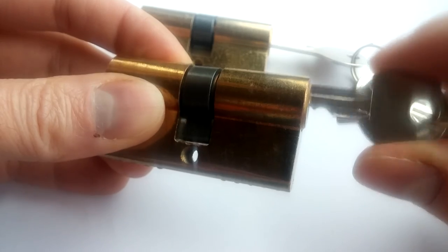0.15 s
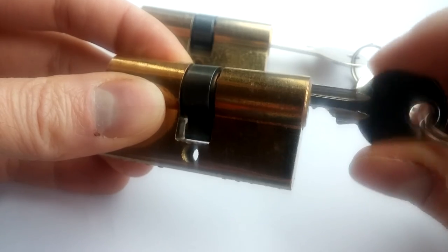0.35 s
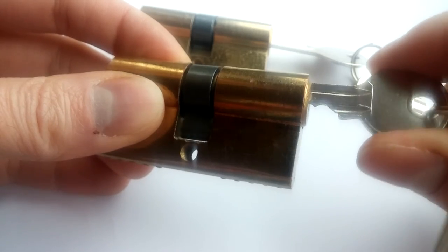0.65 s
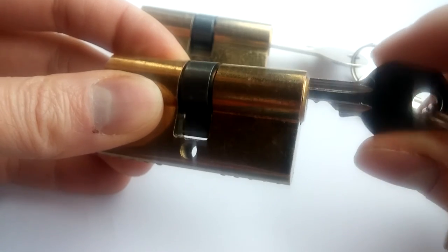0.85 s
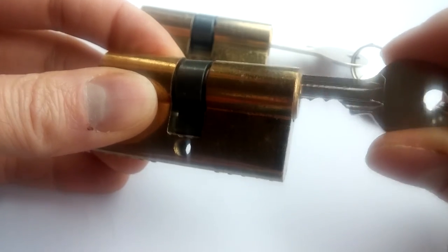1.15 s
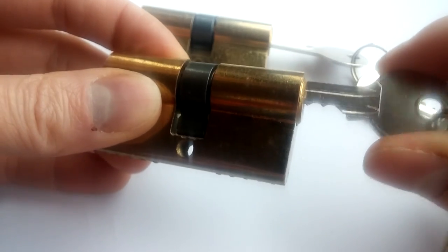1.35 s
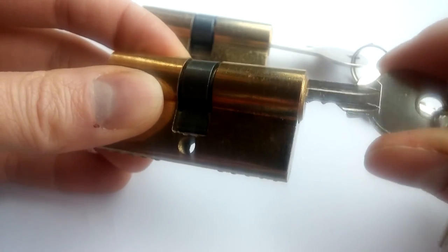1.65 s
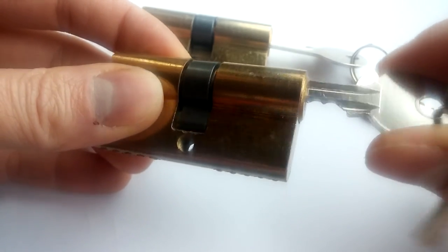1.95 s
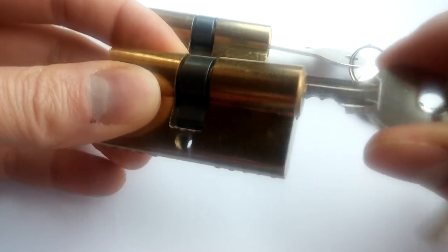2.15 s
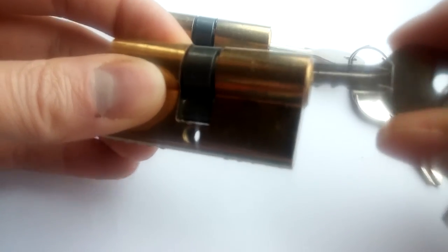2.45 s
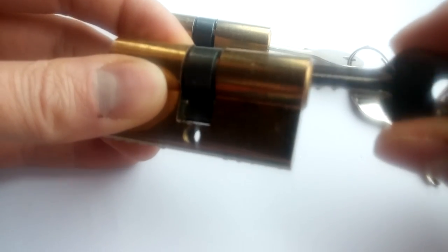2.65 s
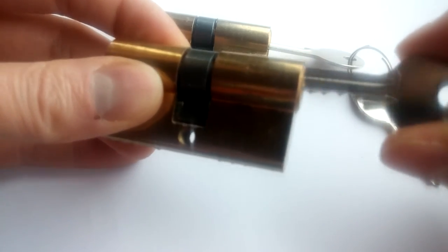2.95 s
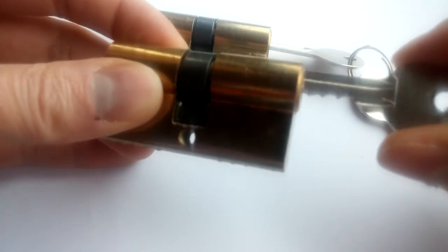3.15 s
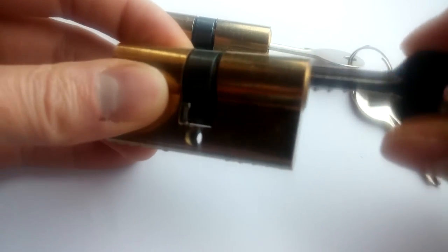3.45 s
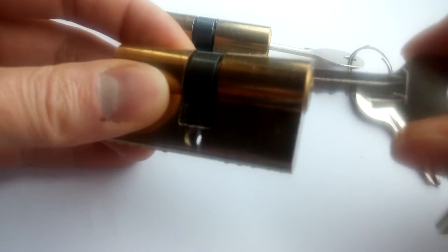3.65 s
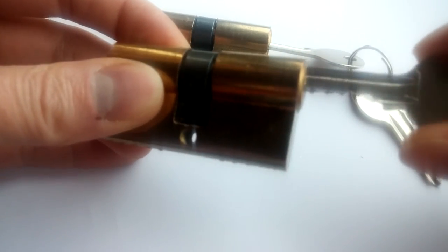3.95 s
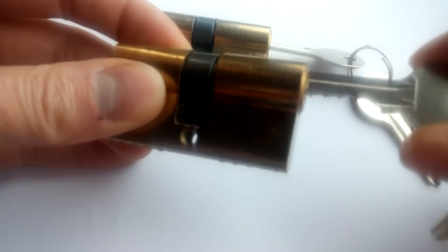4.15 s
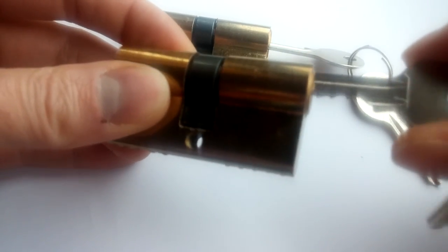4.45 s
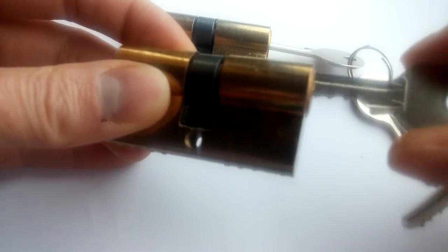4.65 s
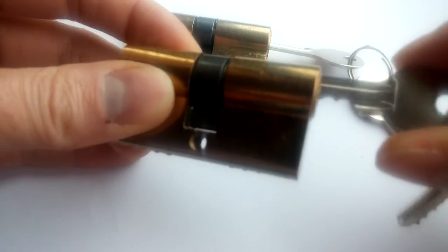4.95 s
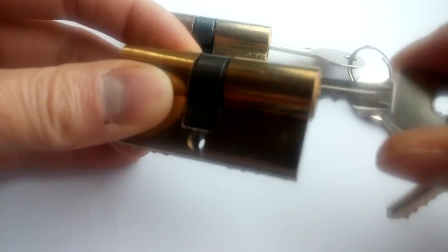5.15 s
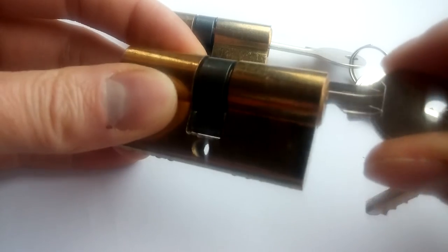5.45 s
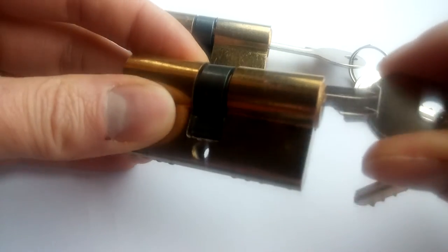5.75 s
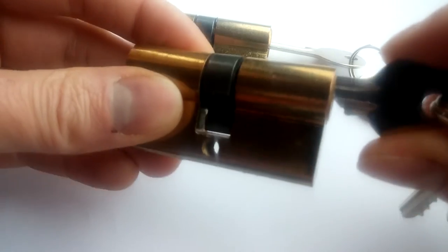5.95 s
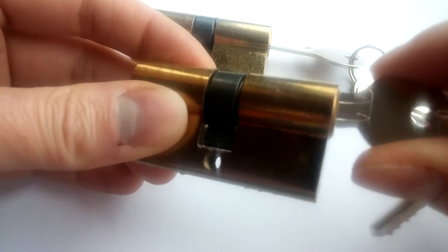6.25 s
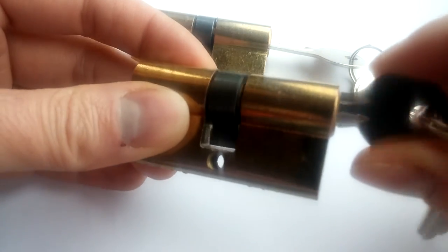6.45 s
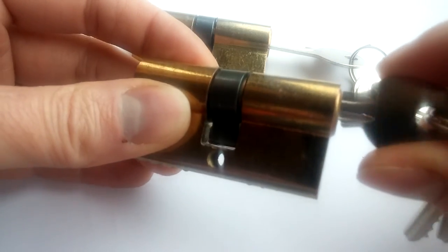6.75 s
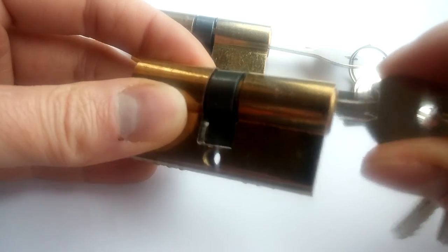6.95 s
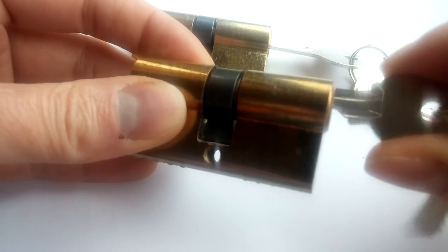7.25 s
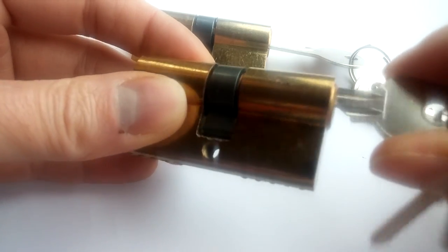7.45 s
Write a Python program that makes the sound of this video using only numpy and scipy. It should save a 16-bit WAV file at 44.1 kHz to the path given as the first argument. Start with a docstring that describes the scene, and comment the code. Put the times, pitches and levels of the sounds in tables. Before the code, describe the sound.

Close up in a small quiet room, a key is worked in a hand-held brass lock cylinder. Its teeth scrape under sprung pins in quick, crisp ratchety clusters, with sharp snaps, thin ringing springs and a few faint clinks of spare keys. Bursts alternate with near-quiet pauses. Soft low bumps and rubbing of hands on a desk come midway and late, ending on a hard click. Stereo microphones hear the metal towards the right.

```python
"""A key works in and out of a hand-held brass lock cylinder, close to the microphones and to their right.
Its teeth rasp under sprung pins that snap into notches: bursts of tiny impacts ring the lock's resonances.
Springs, knocks and spare keys on the ring add decaying tones; idle pins tick faintly.
Hands bump and rub the desk, heard as filtered blows and noise, over a low rumble, a soft hiss and a faint hum.
The small room answers the metal and the bumps with short noise echoes."""
import sys
import numpy as np
from scipy import signal
from scipy.fft import rfft, irfft, next_fast_len
from scipy.io import wavfile
from scipy.ndimage import uniform_filter1d, map_coordinates

SR = 44100
rng = np.random.default_rng(int(sys.argv[2]) if len(sys.argv) > 2 else 0)


def wav_out(sig):
    """Save sig, one row per channel (or a flat mono array), as 16-bit PCM at SR to the path in sys.argv[1]."""
    wavfile.write(sys.argv[1], SR, np.round(np.clip(np.atleast_2d(sig).T, -1, 1) * 32767).astype(np.int16))


N = 334719

# Levels in the tables are relative: gains, scatter and the room come after them.
# Room rumble and hiss: (time [s], rumble level [dB], hiss level [dB])
BACKGROUND_LEVELS = [(0.0, -68, -79), (0.21, -63.5, -75.5), (0.67, -51.5, -64.5), (0.95, -66, -75),
                     (1.92, -51, -66.5), (2.16, -52, -63), (2.49, -54, -61.5), (2.79, -59, -72.5),
                     (3.38, -53, -70), (3.51, -50, -68), (4.06, -58.5, -70.5), (5.24, -54.5, -66),
                     (5.56, -62, -71.5), (5.87, -59.5, -71), (6.24, -43.5, -60.5), (6.51, -58, -69.5),
                     (7.25, -54, -68.5), (7.59, -48.5, -57.5)]
# Colour of the rumble: (frequency [Hz], level [dB])
RUMBLE_COLOUR = [(22, -34.5), (32, -23), (42, 1), (60, 1.5), (96, -7.5), (135, -1), (175, -15),
                 (200, -20.5), (232, -5.5), (275, -23.5), (320, -29), (420, -35), (700, -61.5)]
# Colour of the hiss, also of skin rustle: (frequency [Hz], level [dB])
HISS_COLOUR = [(200, -5), (400, -1), (900, -6), (1400, -13.5), (2500, -14.5), (5000, -19), (10000, -23),
               (16000, -24)]
# Key held lightly, pins ticking at random; none if the end precedes the start: (start [s], end [s])
IDLE_SPANS = [(0.128, .27), (4.3, 5.4), (6.5, 6)]
# Key's teeth passing under the pins: (time of crest [s], level [dB], half length [s], treble [dB])
TOOTH_PASSES = [(0.171, -60, 0.013, -11), (0.289, -40.5, 0.015, -4), (0.369, -48, 0.0085, 5),
                (0.409, -41.5, .009, -0.5), (0.519, -31.5, .012, 2.5), (0.602, -41, 0.0051, 7),
                (0.641, -35, 0.011, 4.5), (.74, -27.5, 0.013, 6), (0.82, -38, .004, 2),
                (0.847, -50, .012, 15), (1.572, -56, 0.013, 0), (1.6, -39, 0.0059, -2),
                (1.671, -35.5, 0.014, 7), (1.861, -35, 0.0092, -1), (2.009, -27.5, 0.0088, 2),
                (2.086, -52, 0.026, 2), (2.139, -27.5, 0.0096, 3.5), (2.245, -27.5, .013, 3),
                (2.328, -47, 0.016, 5), (2.368, -32, .013, 2.5), (2.456, -27.5, 0.014, 4.5),
                (3.307, -50.5, .013, 0), (3.417, -35.5, 0.014, 4.5), (3.464, -35, 0.0046, 13),
                (3.536, -28.5, 0.013, 7.5), (3.623, -31.5, .012, 4), (3.658, -39, 0.013, 15),
                (3.746, -48.5, 0.0066, 5), (3.87, -61.5, .013, 2), (4.38, -48.5, 0.014, -7.5),
                (4.469, -32, 0.012, 0.5), (4.762, -52, 0.0074, -8), (4.898, -52, .012, -10),
                (4.979, -32, 0.01, -7.5), (5.136, -50, .009, -12), (5.22, -29.5, .01, 7),
                (5.33, -52.5, 0.0085, 5), (5.374, -48.5, 0.0091, -1), (5.416, -37, 0.0098, 4.5),
                (5.998, -56, 0.019, -2), (6.148, -54.5, 0.018, 1), (6.178, -47, 0.0045, 3),
                (6.271, -36.5, 0.0077, 3), (6.346, -44.5, 0.0094, -5.5), (6.575, -49.5, 0.0073, -14),
                (6.644, -55, 0.0075, -17), (6.692, -60, 0.013, 11), (7.092, -58, 0.007, -7),
                (7.228, -54.5, 0.011, -1), (7.395, -35.5, 0.017, 1.5), (7.502, -25, 0.0082, 0),
                (7.535, -33.5, 0.0057, 14)]
# Pins snapping home: (time [s], level [dB], treble [dB])
PIN_SNAPS = [(0.19, -44.5, -17), (0.2717, -48, -12), (0.284, -31.5, -2), (0.305, -29.5, 7),
             (0.4176, -30.5, -16), (.505, -32, 6), (0.5266, -26.5, -8), (0.5674, -34.5, 8), (.601, -29, 15),
             (0.6346, -33, 9), (0.6443, -31, 14), (0.6513, -26, -4), (0.732, -29, -2), (0.8203, -36, -3),
             (0.8649, -39.5, 8.5), (1.2141, -25, 13.5), (1.3065, -38.5, 8), (1.5983, -20, 23.5),
             (1.6771, -22.5, 4.5), (1.6966, -29, 11), (1.702, -30, 14), (1.8662, -23, 1.5),
             (2.0513, -34.5, 8), (2.1012, -30.5, 19), (2.132, -16, 15), (2.144, -15.5, 10.5),
             (2.162, -32, 3), (2.2125, -34, 14), (2.235, -22, 10), (2.2415, -18.5, -1.5), (2.262, -27, 15),
             (2.3524, -31, 16), (2.3727, -28.5, -7), (2.4471, -23.5, 12), (2.477, -31, 4),
             (2.4884, -25.5, 9.5), (2.9682, -29.5, 11.5), (3.2918, -41.5, 10.5), (3.3203, -36.5, -5),
             (3.4025, -34, -11), (3.4108, -22, -1), (3.4318, -29, 16), (3.464, -39, 13), (3.531, -41, 14),
             (3.5444, -31.5, 7), (3.647, -26.5, 14), (3.673, -28, 15), (3.8356, -51, 0), (4.461, -29.5, 4),
             (4.5187, -36, 7.5), (4.763, -41.5, -14), (4.9, -40, 7), (4.9768, -38, -15), (4.995, -50, 3),
             (5.199, -30, 18), (5.2116, -25.5, 11), (5.2261, -23.5, -9), (5.308, -38, 9),
             (5.4149, -29.5, 6), (5.745, -56, -24), (6.0353, -32, 4.5), (6.1812, -32.5, 9),
             (6.2656, -28.5, 17), (6.2726, -27, -1), (6.323, -39.5, 1), (6.5354, -51.5, -2),
             (6.682, -49, -0.5), (7.031, -56, 2), (7.093, -42.5, -7), (7.2161, -45.5, -4), (7.371, -31, 9),
             (7.475, -39, 1), (7.493, -27.5, -14), (7.5029, -14.5, -3), (7.5308, -27, 17)]
# Broad colour of the brass lock: (frequency [Hz], level [dB])
BRASS_COLOUR = [(100, -32), (400, -27), (800, -15), (1200, -17), (2000, -9), (2500, 2), (3000, -3),
                (3600, -3.5), (5500, 6), (7200, -4.5), (9000, -4.5), (11000, -9.5), (13300, -14.5),
                (15200, -9)]
# Resonances of springs, pins and key blade: (frequency [Hz], width [Hz], level against the broad colour [dB])
LOCK_RESONANCES = [(1610, 91, -2), (2634, 120, 8.5), (3760, 300, 2.5), (5730, 530, -8), (8490, 110, 2.5),
                   (12300, 130, -4.5), (14700, 140, -8.5), (15350, 350, -2.5)]
# Strength of the springs' ring in a contact: (time [s], level [dB])
SPRING_RING_LEVELS = [(0, -3), (2.0, -2.5), (2.4, -3.5), (3.0, -1.5), (3.5, -1.5), (4.5, 1.5), (7.2, -3.5),
                      (7.35, -6.5)]
# A pin's spring set singing: (time [s], level [dB], frequency [Hz])
SPRING_TONES = [(0.294, -32, 2640), (0.511, -26, 8490), (0.750, -36, 2646), (1.306, -47, 4050),
                (1.425, -52.5, 2560), (1.820, -44, 2660), (2.240, -35, 2634), (2.969, -45, 2700),
                (3.461, -40, 2540), (3.499, -41.5, 2670), (3.746, -47.5, 8500), (4.358, -51.5, 2640),
                (4.465, -24.5, 8490), (4.971, -28.5, 8490), (5.205, -36, 8490), (6.176, -27.5, 8490),
                (6.180, -37.5, 2670), (6.266, -44, 8490), (7.091, -62, 2590)]
# Fingers shifting their grip: (start [s], length [s], level [dB], hardness [Hz])
GRIP_SHIFTS = [(0.502, 0.1, -49, 250), (1.22, .05, -54.5, 350), (2.0, 0.39, -47.5, 151),
               (2.629, 0.11, -40, 150), (3.391, 0.33, -46, 143.6), (4.449, 0.093, -46.5, 258),
               (5.218, 0.1, -44.5, 280), (6.079, .18, -42, 216), (6.33, .13, -37.5, 260)]
# Key's shoulder knocking on the cylinder: (time [s], level [dB], frequency [Hz])
SHOULDER_KNOCKS = [(0.740, -33.5, 800), (2.144, -26, 1730), (2.240, -38.5, 790), (2.457, -39.5, 920),
                   (5.225, -32.5, 1600), (7.501, -28.5, 1565)]
# Spare key struck: (time [s], level [dB])
KEY_CLINKS = [(2.246, -41.5), (2.26, -43), (3.424, -43), (3.653, -49), (7.501, -36), (7.531, -45)]
# Modes of a spare key: (frequency [Hz], level [dB], t60 [s])
SPARE_KEY_MODES = [(3946, -2, .1), (5184, -6, .1), (6013, -4, .1), (7400, -9, .14), (8450, -5, .11),
                   (9076, -11, .09), (11360, -2, .13), (14670, -4, .1)]
# Hands bumping the desk: (time [s], level [dB], hardness [Hz])
DESK_BUMPS = [(2.63, -28.5, 168), (2.646, -24.5, 232), (5.962, -25.5, 684), (5.971, -24.5, 750),
              (5.98, -27.5, 400), (6.079, -18.5, 174), (6.347, -31, 400)]
# Resonances of the desk: (frequency [Hz], width [Hz], level [dB])
DESK_RESONANCES = [(71.3, 39, 6), (145, 52, 0.5), (238, 37, -7.5), (400, 660, -13.5), (800, 45, -6)]
# Left channel's gain on the metal, as the lock sits to the right: (frequency [Hz], gain [dB])
LEFT_GAIN = [(300, 5.5), (800, 0.5), (1300, 1), (2400, -10), (4400, -14), (8100, -10.5), (12500, -7),
             (15000, -3.5)]
# Decay of the small room: (frequency [Hz], t60 [s])
ROOM_DECAY = [(200, 0.55), (2600, .3), (8000, 0.22), (16000, 0.025)]

TOP_HZ = 16000  # the microphones' band limit
SIZE = 8192  # samples in one short sound
AGE = np.arange(SIZE) / SR
HZ = np.fft.rfftfreq(SIZE, 1 / SR)
DRAG_DB, DRAG_T60 = -16.5, 0.14  # past the tooth, the blade drags on in the keyway (t60 in s)
CATCH, RELEASE = 1, 1.18  # a tooth's rise and fall, in half lengths
# loose pins tick around each tooth: rate, level against the rasp, spread in half lengths
TICKS_PER_S, TICKS_DB, TICKS_SPREAD = 390, -14, 2.7


def amp(db):
    """Decibels to gain."""
    return 10 ** (np.asarray(db) / 20)


def unit(x):
    """Scale to rms 1."""
    return x / np.sqrt(np.mean(x ** 2) + 1e-20)


def along(points, hz):
    """Read (frequency [Hz], value) points on a log axis."""
    f, v = np.transpose(points)
    return np.interp(np.log(hz + 1), np.log(f), v)


def filtered(x, response):
    """Multiply the spectrum of x by a response of frequency."""
    m = next_fast_len(N + SR // 2)
    return irfft(rfft(x, m) * response(np.fft.rfftfreq(m, 1 / SR)), m)[..., :N]


def causal(gain):
    """The minimum-phase response that has this gain."""
    cepstrum = irfft(np.log(np.maximum(gain, 1e-6)))
    cepstrum[1:SIZE // 2] *= 2
    cepstrum[SIZE // 2 + 1:] = 0
    return np.exp(rfft(cepstrum))


def resonances(modes):
    """Summed response of (frequency [Hz], width [Hz], level [dB]) resonances."""
    return sum(amp(db) * 1j * HZ * w / (f * f - HZ * HZ + 1j * HZ * w) for f, w, db in modes)


def add(track, s, sound):
    """Mix a sound into the track from time s."""
    start = max(round(s * SR), 0)
    part = track[..., start:start + sound.shape[-1]]
    part += sound[..., :part.shape[-1]]


def wobble(per_s):
    """A smooth random curve with this many knots a second."""
    return map_coordinates(rng.standard_normal(256), [np.arange(N) * per_s / SR], mode="wrap")


def impacts(per_s, scatter_db):
    """Tiny blows at random moments, of unequal size and either direction."""
    size = amp(scatter_db * np.clip(rng.standard_normal(SIZE), -2, 2))
    struck = rng.random(SIZE) < per_s / SR
    return struck * size * rng.choice([-1, 1], SIZE)


def spring_ring(s):
    """Base strength of the springs' ring at time s, in dB."""
    return np.interp(s, *np.transpose(SPRING_RING_LEVELS))


def contact(force, brass, spring_db, treble_db, t60, ring_db, vary_db=3, apart=0.31, lag_s=.00016):
    """A force rings the lock, heard from two sides; each point of contact weights the modes anew."""
    scatter = rng.standard_normal(SIZE) + apart * rng.standard_normal((2, SIZE))
    local = scatter * amp(-60 * AGE / t60)
    modes = [(hz, width, db + ring_db + vary_db * rng.standard_normal()) for hz, width, db in LOCK_RESONANCES]
    ring = resonances(modes)
    tilt = [(2000, 0.02), (2680, spring_db), (3400, 0), (6200, 0.0), (9000, treble_db)]
    tint = causal(amp(along(tilt, HZ)))
    delays = [lag_s * 2 * rng.random(), 0]  # the left microphone is farther
    late = np.exp(-2j * np.pi * np.outer(delays, HZ))
    sound = irfft(rfft(force) * rfft(local) * brass * (1 + ring) * tint * late)
    return sound / np.linalg.norm(sound, axis=1, keepdims=True)


def background(apart=0.57, hiss_gain_db=6.5, uneven_db=2, uneven_per_s=9):
    """Noise partly shared by both channels makes an uneven rumble; separate noises make a diffuse hiss."""
    s, *columns = np.transpose(BACKGROUND_LEVELS)
    rumble_db, hiss_db = [np.interp(np.arange(N) / SR, s, c) for c in columns]
    low = rng.standard_normal(N) + apart * rng.standard_normal((2, N))
    rumble = unit(filtered(low, lambda hz: amp(along(RUMBLE_COLOUR, hz)))) * amp([[2.5], [-3]])
    # the hiss leans left, most of all below 800 Hz
    lean = lambda hz: amp(np.outer([.5, -.5], along([(800, 5.5), (2500, 1)], hz)))
    hiss = unit(filtered(rng.standard_normal((2, N)), lambda hz: amp(along(HISS_COLOUR, hz)) * lean(hz)))
    rumble_gain = amp(rumble_db + uneven_db * wobble(uneven_per_s))
    return rumble_gain * rumble + amp(hiss_db + hiss_gain_db) * hiss


def hum(hz=250, width_hz=28, db=-72, early_db=6, settle_s=0.33):
    """A narrow band of noise gives a faint, wavering room hum, a little stronger at first."""
    band = lambda f: np.exp(-.5 * ((f - hz) / width_hz) ** 2)
    level_db = db + early_db * np.exp(-np.arange(N) / SR / settle_s)
    return amp(level_db) * unit(filtered(rng.standard_normal(N), band))


def idle_ticks(gap_s=.14, db=-40, scatter_db=3, spring_db=5, treble_db=-9, chatter_t60=0.033):
    """Under a light touch the pins settle in faint, dull ticks at uneven gaps."""
    brass = causal(amp(along(BRASS_COLOUR, HZ)))
    track = np.zeros((2, N))
    for start, end in IDLE_SPANS:
        for s in np.arange(start, end, gap_s):
            force = (AGE == 0) + impacts(990, 3) * amp(-60 * AGE / chatter_t60)
            tick = contact(force, brass, spring_db, treble_db, t60=0.0066, ring_db=-18)
            add(track, s + gap_s * rng.random(), amp(db + scatter_db * rng.standard_normal()) * tick)
    return track


def teeth(slips_per_s=430, slip_scatter_db=6, tick_scatter_db=4, tick_treble_db=3, count=3):
    """Several pins stick and slip over each tooth in a swell of tiny impacts; loose pins tick around it."""
    brass = causal(amp(along(BRASS_COLOUR, HZ)))
    track = np.zeros((2, N))
    for s, db, half, treble_db in TOOTH_PASSES:
        spring_db = spring_ring(s) - 1.5
        lead = 2 * half
        since = AGE - lead
        crest = np.exp(-.5 * (since / (half * np.where(since < 0, CATCH, RELEASE))) ** 2)
        drag = (since > 0) * amp(DRAG_DB - 60 * np.abs(since) / DRAG_T60)
        swell = np.maximum(crest, drag)
        rasp = 0
        for pin in range(count):
            slips = impacts(slips_per_s, slip_scatter_db) * swell
            rasp = rasp + contact(slips, brass, spring_db, treble_db, t60=0.0039, ring_db=1.5) / np.sqrt(count)
        loose = np.exp(-.5 * (since / (TICKS_SPREAD * half)) ** 2) * (since > -half)
        first = np.arange(SIZE) == round(half * SR)  # as the tooth catches
        taps = impacts(TICKS_PER_S, tick_scatter_db) * loose + first
        ticks = contact(taps, brass, spring_db, treble_db + tick_treble_db, t60=.006, ring_db=-5)
        add(track, s - lead, amp(db) * np.linalg.norm(swell) * (rasp + amp(TICKS_DB) * ticks))
    return track


def pins(chatter=.75, chatter_t60=.024, lead_in=0.057, extra_spring_db=1.5):
    """A pin skids off a tooth's edge, snaps into the notch and chatters."""
    brass = causal(amp(along(BRASS_COLOUR, HZ)))
    track = np.zeros((2, N))
    lead = 256 / SR
    since = AGE - lead
    for s, db, treble_db in PIN_SNAPS:
        skid = rng.standard_normal(SIZE) * (since < 0) * amp(-60 * np.abs(since) / 0.0081)
        bounces = impacts(3000, 4.4) * (since > 0) * amp(-60 * np.abs(since) / chatter_t60)
        force = lead_in * skid / np.linalg.norm(skid) + (since == 0)
        force = force + chatter * bounces / (np.linalg.norm(bounces) + 1e-9)
        spring_db = spring_ring(s) + extra_spring_db
        snap = contact(force, brass, spring_db, treble_db, t60=0.0074, ring_db=-3.0)
        add(track, s - lead, amp(db) * 10 * snap)  # 10: energy as rms over 100 samples
    return track


def shudder(metal, db=-29.5, follows=0.63, settle_s=0.016, apart=0.96):
    """Work on the key shakes the hands and the desk: a low throb that outlasts each scrape."""
    keep = np.exp(-1 / (settle_s * SR))
    effort = np.sqrt(signal.lfilter([1 - keep], [1, -keep], metal[1] ** 2))
    low = rng.standard_normal(N) + apart * rng.standard_normal((2, N))
    # (frequency [Hz], level [dB])
    colour = [(25, -36), (55, -4.5), (135, -8.5), (200, -11.5), (300, -22), (900, -28.5), (1500, -42.5)]
    throb = unit(filtered(low, lambda hz: amp(along(colour, hz))))
    return amp(db) * effort ** follows * throb * amp([[2.5], [-2.5]])


def springs(t60=0.089, rise_s=0.0012, waver=0.0038):
    """A spring swells to one pitch, wavers as its load changes, and is soon damped."""
    track = np.zeros(N)
    for s, db, hz in SPRING_TONES:
        drift = unit(uniform_filter1d(rng.standard_normal(SIZE), size=200))
        phase = 2 * np.pi * np.cumsum(hz * (1 + waver * drift)) / SR
        envelope = amp(db - 60 * AGE / t60) * (1 - np.exp(-AGE / rise_s))
        add(track, s, envelope * np.sin(phase))
    return track


def grips(fade_s=0.011, jerk_db=3, jerks_per_s=30, low_hz=55, apart=1.0, rustle_db=-17, ease_db=7):
    """Skin drags unevenly on the cylinder, rustles and eases; the hands carry it to the desk, which drones."""
    t = np.arange(N) / SR
    track = np.zeros((2, N))
    skin = irfft(causal(amp(along(HISS_COLOUR, HZ))))
    for s, length, db, hard_hz in GRIP_SHIFTS:
        age = t[:round((length + fade_s) * SR)]
        gate = np.clip(np.minimum(age, length + fade_s - age) / fade_s, 0, 1)
        unevenness = map_coordinates(rng.standard_normal(32), [age * jerks_per_s])
        jerks = amp(jerk_db * unevenness - ease_db * age / length)
        friction = rng.standard_normal(len(age)) + apart * rng.standard_normal((2, len(age)))
        force = friction * gate * jerks
        softness = causal(1 / np.sqrt(1 + (HZ / hard_hz) ** 4))
        desk = irfft(softness * resonances(DESK_RESONANCES) * (1j * HZ / (1j * HZ + low_hz)) ** 2)
        body = unit(desk) + amp(rustle_db) * unit(skin)
        drone = signal.fftconvolve(force, body[None], axes=1)
        add(track, s, amp(db) * drone * np.linalg.norm(gate) / np.linalg.norm(drone[0]))
    return track * amp([[2], [-2.5]])


def knocks(t60=0.015):
    """The hand damps the heavy cylinder, so a knock is a tone that dies within milliseconds."""
    track = np.zeros(N)
    for s, db, hz in SHOULDER_KNOCKS:
        add(track, s, amp(db - 60 * AGE / t60) * np.sin(2 * np.pi * hz * AGE))
    return track


def spare_keys():
    """Each clink rings a hanging key's modes at new strengths."""
    track = np.zeros(N)
    for s, db in KEY_CLINKS:
        for hz, level, t60 in SPARE_KEY_MODES:
            strength_db = db + level + rng.normal(0, 2.4)
            add(track, s, amp(strength_db - 60 * AGE / t60) * np.sin(2 * np.pi * hz * AGE))
    return track


def bumps(rub=0.0495, rub_t60=0.14):
    """Soft blows on the desk, each with a brief rub of skin; harder ones reach higher."""
    track = np.zeros(N)
    for s, db, hard_hz in DESK_BUMPS:
        force = (AGE == 0) + rub * rng.standard_normal(SIZE) * amp(-60 * AGE / rub_t60)
        softness = causal(1 / np.sqrt(1 + (HZ / hard_hz) ** 6))
        radiation = 1j * HZ / (1j * HZ + 40)  # the deepest bass does not radiate
        thud = irfft(rfft(force) * softness * resonances(DESK_RESONANCES) * radiation)
        add(track, s, amp(db) * thud / np.abs(thud).max())
    return track * amp([[1.5], [-2.5]])


def room(x, near_db=-10, near_t60=0.031, tail_db=-15.0, count=24):
    """Hands and desk reflect at once, the walls later; the pattern changes as the hands move."""
    out = np.zeros((2, N))
    for piece in np.array_split(np.arange(N), count):
        hz, t, z = signal.stft(rng.standard_normal((2, SR // 3)), SR, nperseg=256)
        decay = amp(-60 * t / along(ROOM_DECAY, hz)[:, None])
        tail = signal.istft(z * decay, SR, nperseg=256)[1]
        age = np.arange(tail.shape[1]) / SR
        tail *= 1 - np.exp(-age / 0.0018)
        near = rng.standard_normal(tail.shape) * amp(-60 * age / near_t60) * (age > .0006)
        walls = amp(tail_db) * tail / np.linalg.norm(tail[0])
        echo = walls + amp(near_db) * near / np.linalg.norm(near[0])
        add(out, piece[0] / SR, signal.fftconvolve(x[:, piece], echo, axes=1))
    return out


def scene(metal_db=2.5, left_room_db=7.0):
    """The metal is louder on the right; its reflections are spread more evenly."""
    metal = idle_ticks() + teeth() + pins() + springs() + knocks() + spare_keys()
    heard = metal + room(metal) * amp([[left_room_db], [0]])
    heard = filtered(heard, lambda hz: amp(np.outer([1, 0], along(LEFT_GAIN, hz))))
    thuds = bumps()
    thuds = thuds + room(thuds)
    return background() + hum() + amp(metal_db) * heard + shudder(metal) + grips() + thuds


def record(dry):
    """The microphones pass almost nothing above their band limit."""
    return filtered(dry, lambda hz: 1 / (1 + (hz / TOP_HZ) ** 120))


dry = scene()
out = record(dry)
wav_out(out)
```